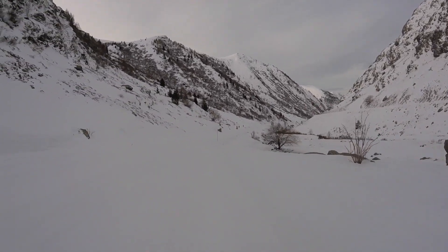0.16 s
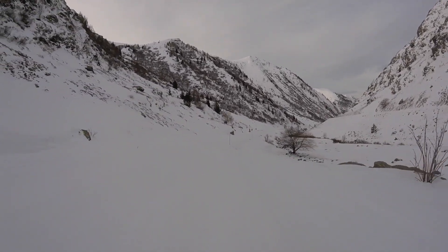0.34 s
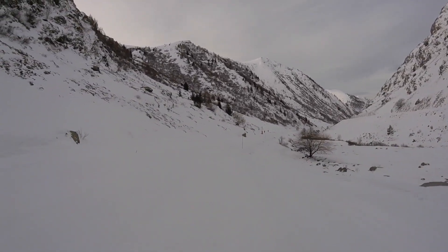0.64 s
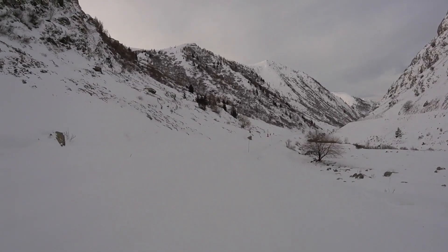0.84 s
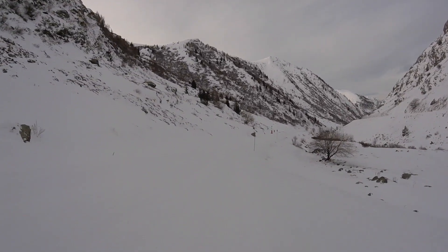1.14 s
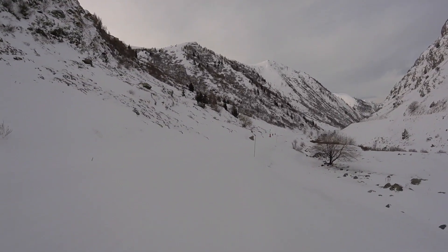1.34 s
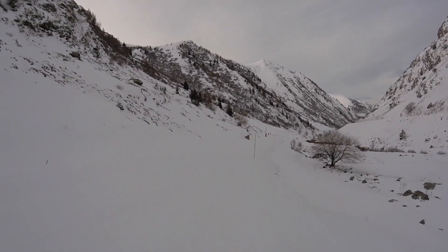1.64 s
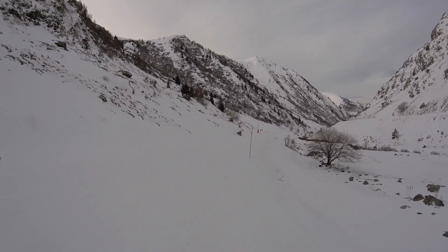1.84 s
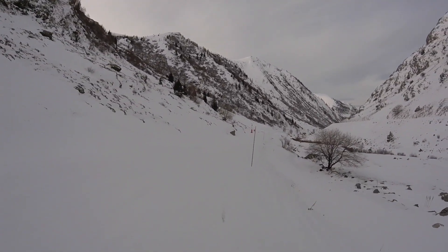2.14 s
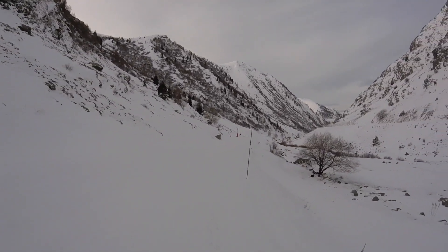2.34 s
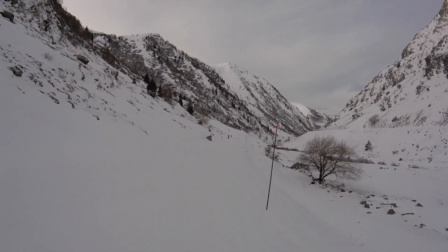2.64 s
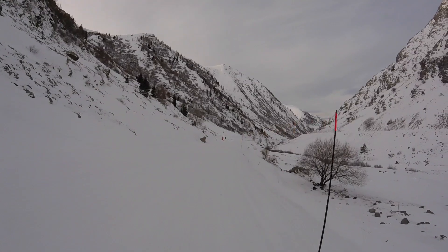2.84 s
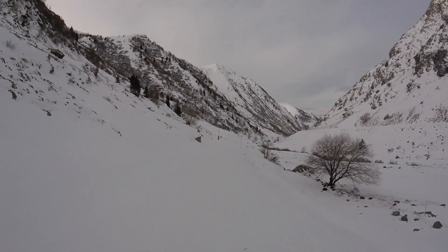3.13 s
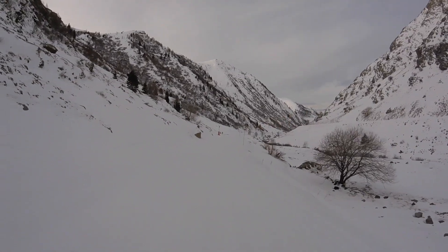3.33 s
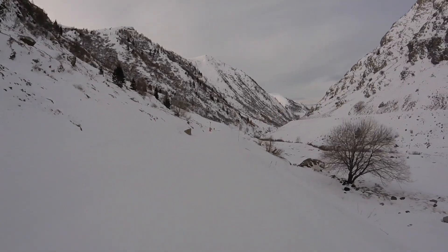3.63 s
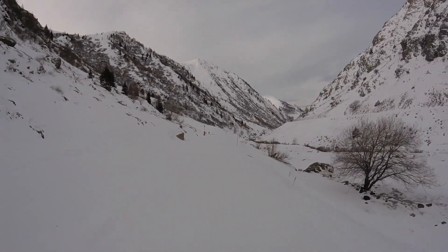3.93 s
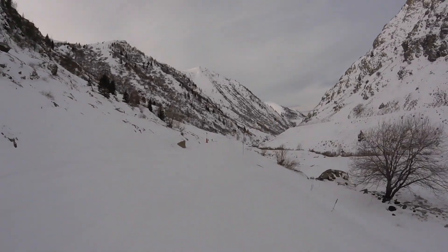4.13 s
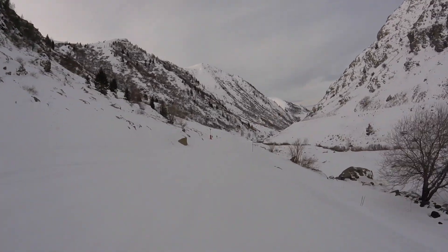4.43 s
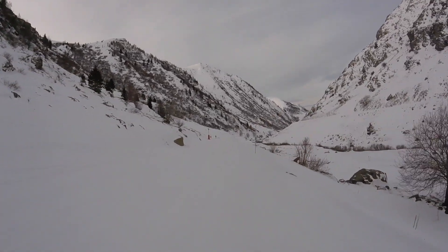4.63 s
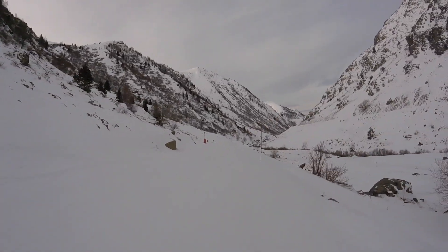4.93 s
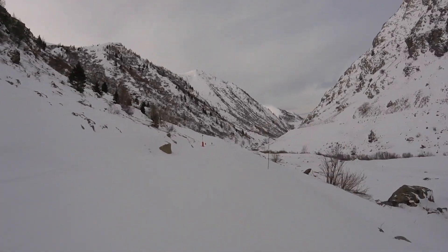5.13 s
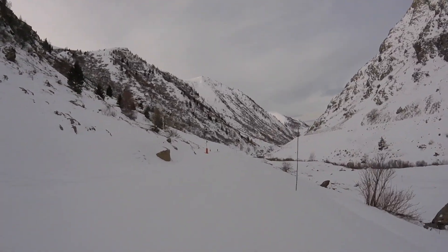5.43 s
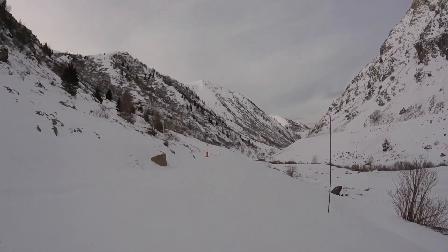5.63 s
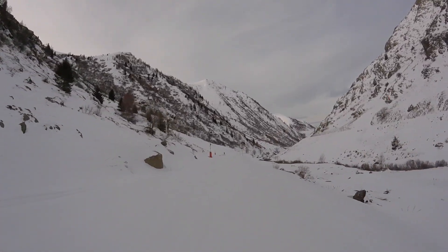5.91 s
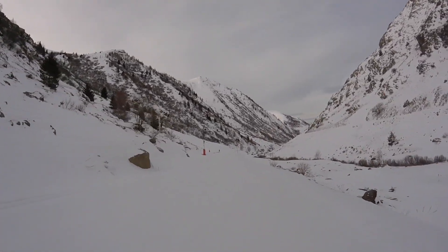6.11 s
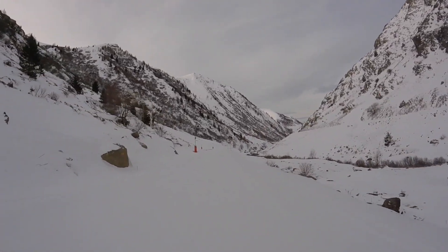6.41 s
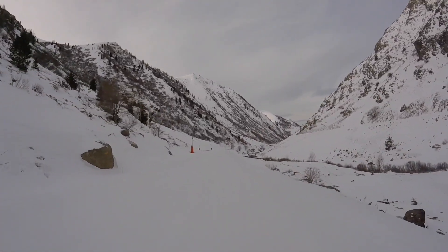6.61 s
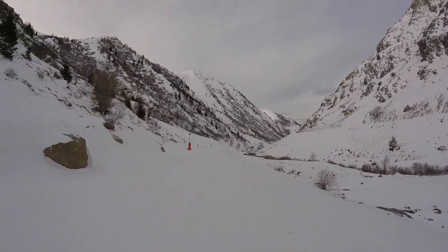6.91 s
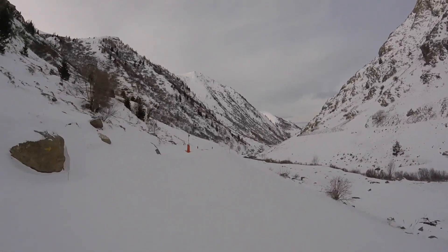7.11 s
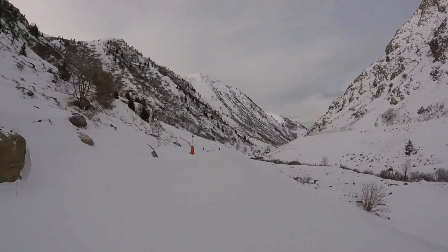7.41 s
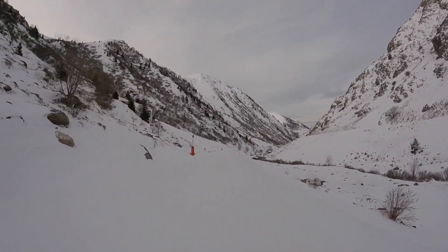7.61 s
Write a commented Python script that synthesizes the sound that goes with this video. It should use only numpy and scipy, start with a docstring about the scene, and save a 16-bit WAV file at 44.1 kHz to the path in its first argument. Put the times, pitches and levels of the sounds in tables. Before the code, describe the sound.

Skis glide over snow with a patchy crunch and small cracks, under gusting low wind rumble on the microphone.

```python
"""On a snow slope, gliding on skis; the microphone is a small camera's, carried by the skier in a
closed plastic case. Underfoot, snow grains crush in a dense, patchy crackle and crusts crack now and
then, all coloured by the resonances of the case. Right on the case, wind buffets with a deep rumble
over a steady rush. Two faint thin tones sit in the treble."""
import sys
import numpy as np
from scipy import signal
from scipy.fft import rfft, irfft
from scipy.io import wavfile
from scipy.ndimage import uniform_filter1d

SR = 44100
rng = np.random.default_rng(int(sys.argv[2]) if len(sys.argv) > 2 else 0)


def to_wav(sig):
    """Store sig (one row per channel, or 1-D mono) as 16-bit WAV at the path in sys.argv[1].

    Samples outside -1..1 are clipped; the rate is SR.
    """
    pcm = np.clip(np.atleast_2d(sig), -1, 1) * 32767
    pcm = np.round(pcm).astype(np.int16)
    wavfile.write(sys.argv[1], SR, pcm.T)  # frames by channels


N = 342216
T = np.arange(N) / SR

# Crusts cracking, with their peaks before coupling to the case: start_s, low_modes_db, then relative
# to that: deep_db, upper_low_db, middle_db, upper_middle_db, top_db, sheen_db
CRUST_CRACKS = [(0.124, -58, -11, -6, -20, -17, -22, -10), (0.138, -51, -10, -9, -21, -19, -18, -14),
                (0.1534, -57.0, -12, 10, -1, -5, -4, -3), (0.1616, -51, -10, -2, 0, -7, -22, -16),
                (0.2177, -50, -2, -4, -11, -16, -16, -16), (0.2353, -48, -22, -6, -8, -12, -14, -15),
                (0.2933, -55, -12, -10, -6, -17, -22, -9), (0.3141, -56, -16, 5, -15, -13, -10, -6),
                (0.4218, -52, -9, 1, -16, -18, -11, -17), (0.4644, -50, -11, -4, -16, -13, -19, -20),
                (0.5175, -52, -3, 1, -4, -16, -13, -16), (0.6895, -56, -15, -3, -14, -16, -11, -14),
                (1.0185, -53, -12, -3, -3, -5, -11, -12), (1.064, -53, -7, -10, -10, -7, -16, -11),
                (1.225, -56, -7, -3, -3, -6, -13, -9), (1.3134, -48, -10, -2, -22, -22, -21, -14),
                (1.6828, -49.5, -18, -4, -1, -14, -19, -18), (1.698, -60, -6, 4, 7, 1, -12, -6),
                (1.7032, -61, -6, 5, 11, 1, -12, -5), (1.797, -59.5, -6, -3, 5, 2, -10, -6),
                (1.843, -54, 0, 0, -10, -9, -18, -10), (1.924, -46, -9, -14, -15, -19, -9, -8),
                (1.9537, -51, 1, -10, 2, 2, -13, -3), (1.966, -50, -1, -5, -6, -18, -16, -11),
                (1.9736, -48, -8, 0, -8, -17, -19, -10), (1.983, -57, -7, 0, 3, -9, -14, -10),
                (2.074, -46, -3, -3, 2, -5, -15, -3), (2.0932, -53, -2, 5, 6, 5, -8, -11),
                (2.1006, -52, -7, -9, -1, -1, -12, -12), (2.112, -55.0, -7, -5, -3, -4, -13, -9),
                (2.193, -54, -17, -13, -21, -13, -21, -13), (2.2622, -51, -6, -3, -2, -11, -13, -10),
                (2.29, -55, -6, 7, 5, -7, -6, 6), (2.422, -50, 0, 1, -11, -4, -17, -16),
                (2.4847, -62, -7, -3, 11, 12, 14, 12), (2.497, -58, -6, 6, 14, 8, 6, 7),
                (2.5638, -54, 7, 0, -6, -11, -12, -16), (2.6892, -50.5, -2, -4, -5, -5, -24, -16),
                (2.704, -48, -13, -8, -8, -12, -22, -17), (2.7113, -52, -7, -2, -5, -10, -23, -13),
                (3.0246, -48, -8, 0, -11, -17, -23, -25), (3.3298, -45, 3, -16, -11, -9, -17, -14),
                (3.342, -47.5, 7, -20, -9, -7, -20, -16), (3.4236, -45.5, -21, -2, -16, -21, -31, -17),
                (3.446, -53, 12, -14, -11, -21, -15, -15), (3.4653, -47, -7, -3, -4, -7, -20, -19),
                (3.504, -48.5, 2, 1, -5, -7, -18, -11), (3.632, -53, -8, -1, -6, -4, -12, -12),
                (3.661, -50.0, -9, -2, -12, -18, -25, -16), (3.694, -44, -12, -3, -4, -16, -22, -10),
                (3.7632, -44, -5, -15, -12, -15, -18, -13), (3.7732, -43.5, -11, -8, -10, -15, -18, -16),
                (3.7908, -57.0, -2, -2, 0, -1, -9, -9), (3.7997, -40.5, 6.5, -15, -14, -15, -26, -23),
                (3.8167, -59, -8, -8, -10, -12, -10, 4), (3.849, -59, -8, -2, 3, -4, -12, -8),
                (3.8665, -50, -10, 1, -19, -14, -20, -12), (4.0266, -60, 1, 2, 6, -6, -9, -9),
                (4.103, -53, -6, -3, -10, -15, -15, -13), (4.3535, -57.5, -5, 4, 3, -3, -6, 2),
                (4.4284, -56, -6, 4, 6, -3, -7, -2), (4.5016, -53.5, -5, -8, -10, -12, -18, -20),
                (4.5522, -46.5, -10, 2.5, -16, -20, -22, -16), (4.7184, -50, -13, -19, -16, -15, -19, -17),
                (4.737, -56, -9, 6.5, -10, -18, -15, -13), (4.7786, -41, -13, -3.5, -7, -11, -19, -8),
                (4.7864, -65, 0, 6, 11, 10, -8, -7), (4.8078, -51, 7, 4, -4, -17, -19, -15),
                (4.819, -51, 5, -6, 0, -6, -11, -5), (5.0942, -50.5, 1, -5, -14, -5, -12, -18),
                (5.166, -55, -5, -3, -7, -11, -4, -6), (5.2313, -56.5, -11, 4, 0, -8, -9, -7),
                (5.3074, -53, -7, -3, -10, -3, -15, -8), (5.3547, -56, -12, -16, -23, -16, -15, -16),
                (5.444, -54, -8, -2, -14, -14, -18, -18), (5.482, -45, -23, -1.5, -5, -21, -7, -10),
                (5.6044, -57, -9, -6, -11, -10, -22, -19), (5.6845, -47, 4, -19, -16, -11, -16, -17),
                (5.9585, -54.5, -18, -3, -3, -12, -12, -18), (6.064, -56.5, 7, -16, -14, -14, -15, -16),
                (6.44, -53, -10, -18, -8, -7, -16, -11), (6.461, -53, -8, -15, -9, -13, -17, -14),
                (6.6803, -46.5, -7, -14, -9, -17, -19, -19), (6.7396, -49, -9, -5, -11, -25, -27, -20),
                (6.7472, -52, 0, -11, -8, -9, -19, -15), (6.768, -48.5, -8, -16, -9, -15, -23, -19),
                (6.8368, -52, -13, -13, -17, -23, -16, -17), (6.88, -52, -8, -5, -15, -18, -22, -13),
                (7.0255, -52, -11, -3, -17, -13, -18, -19), (7.1978, -45, -4, -1, -11, -8, -9, -17),
                (7.2144, -56, -20, -10, -7, -15, -16, -20), (7.223, -43, 2, -8, -20, -20, -29, -25)]


def undb(db):
    return 10 ** (np.asarray(db) / 20)


def unit(x):
    return x / np.sqrt(np.mean(x ** 2))


def curves(table):
    """Columns of a table, joined by straight lines in time."""
    times, *columns = np.transpose(table)
    return [np.interp(T, times, column) for column in columns]


def bells(centre_s, half_s, height):
    """Sum of bell-shaped swells."""
    coarse = T[::64]
    shapes = np.exp(-((coarse - np.c_[centre_s]) / np.c_[half_s]) ** 2)
    return np.interp(T, coarse, height @ shapes)


def wander(rate_hz):
    """Random levels, held and smoothed twice; rms 1."""
    hold = int(SR / rate_hz)
    steps = np.repeat(rng.standard_normal(N // hold + 1), hold)
    return unit(uniform_filter1d(uniform_filter1d(steps, hold), hold)[:N])


def coloured(spectrum):
    """Noise of rms 1 with the given spectral shape."""
    hz, db = np.transpose(spectrum)
    grid = np.fft.rfftfreq(N, 1 / SR) + 1e-3
    gain = undb(np.interp(np.log(grid), np.log(hz), db))
    return unit(irfft(rfft(rng.standard_normal(N)) * gain, N))


def case_ring(modes, size=2048):
    """Impulse response of the plastic case: steep resonances whose powers add; energy 1."""
    f = np.fft.rfftfreq(size, 1 / SR) + 1
    power = sum(undb(2 * db) / (1 + ((f - hz * hz / f) / width) ** 2) ** 2 for hz, width, db in modes)
    cepstrum = irfft(np.log(power) / 2)
    cepstrum[1:size // 2] *= 2  # minimum phase: the ring follows the push
    cepstrum[size // 2 + 1:] = 0
    response = irfft(np.exp(rfft(cepstrum)))[:size // 2]
    return response / np.sqrt(np.sum(response ** 2))


def snow_grains(per_s, spread_db):
    """Grains break at random moments with uneven strength."""
    breaks = rng.random(N) < per_s / SR
    clicks = breaks * rng.standard_normal(N)
    return unit(clicks * undb(spread_db * np.minimum(rng.exponential(size=N), 4)))


def snow_lumps(per_s, rise_s, fall_s):
    """The level rises as a ski meets a lump, then falls away; mean 0, spread 1."""
    level = (rng.random(N) < per_s / SR) * rng.random(N)
    for lag_s in (rise_s, fall_s):
        level = signal.lfilter([1], [1, -np.exp(-1 / (lag_s * SR))], level)
    level = np.tanh(unit(level) / 2)  # piled-up lumps saturate
    return unit(level - np.mean(level))


def skis():
    """Crushed snow and cracking crusts ring the case in eight groups of modes."""
    # Crush in each group: time_s, low_db, upper_low_db, middle_db, upper_middle_db, top_db, sheen_db
    glide = [(0.0, -61.5, -65, -68, -70.5, -74, -75), (0.28, -62.5, -66.5, -71.5, -75, -76, -77.5),
             (0.45, -64.5, -66.5, -72.5, -78, -75, -79), (0.65, -69.5, -77, -74, -78, -80.5, -81.5),
             (0.95, -66.5, -68, -72, -72.5, -77.5, -78), (1.2, -65.5, -70, -70, -71, -77, -77.5),
             (1.42, -68.5, -71.5, -71, -75, -81, -81), (1.71, -68.5, -70.5, -74, -77, -82, -82),
             (1.9, -67.5, -75, -72, -72, -80, -77.5), (2.07, -67.5, -69, -72, -73, -81, -77.5),
             (2.35, -65, -75, -69, -71, -78, -76.5), (2.55, -63, -68, -67.5, -69.5, -80, -76.5),
             (2.72, -63.5, -64, -65, -67.5, -80, -76), (2.9, -63, -67.5, -64, -66.5, -78, -74.5),
             (3.12, -62, -66, -66, -66.5, -78, -78), (3.39, -59, -66, -62, -64.5, -77, -74),
             (3.65, -62.5, -65, -66.5, -66.5, -77.5, -75.5), (3.87, -65, -71, -67.5, -71.5, -79, -77.5),
             (4.2, -67.5, -70.5, -72, -74, -83, -79.5), (4.5, -66, -66.5, -68, -72, -78, -79),
             (4.75, -65, -67.5, -70.5, -71.5, -77, -77.5), (5.06, -63.5, -63.5, -68.5, -68.5, -75.5, -77.5),
             (5.35, -67.5, -66, -70, -71.5, -77, -77.5), (5.65, -65.5, -72, -73, -76, -79, -80.5),
             (5.9, -68.5, -72, -72, -76.5, -82, -81), (6.3, -64, -70, -72.5, -73.5, -78, -81),
             (6.55, -67.5, -72, -72.5, -76.5, -82, -81), (6.9, -67, -72.5, -75, -75.5, -81.5, -81),
             (7.15, -66, -72, -73, -77.5, -82, -81.5), (7.4, -66, -71.5, -73, -72.5, -80, -81),
             (7.76, -68, -69, -71, -77, -81, -82)]
    # Crush in the deep modes against the low, and in the high against the sheen: time_s, offset_db
    deep_offset, high_offset = [(0, -6), (.6, -2), (1.5, -6), (2.0, -2), (2.45, -3), (2.8, -6),
                                (3.35, -4.5), (3.8, -4.5), (4.1, -2.5), (4.6, -6), (5.4, -3.5), (5.7, -5.5),
                                (6.1, -3.5), (6.8, -5), (7.3, -4.5), (7.76, -5)], [(0, -1), (1.2, 0), (2.0, -1), (2.4, -1), (2.85, -5),
                                               (3.2, -1.5), (3.7, -3.5), (4.5, 0), (6, -1), (7.76, -1)]
    # Rough patches scraping past; each group takes a share: centre_s, swell_db, half_length_s
    scrapes = [(0.083, 2, 0.033), (0.162, 3, 0.019), (0.308, 3.5, 0.012), (0.453, 3, 0.02),
               (1.083, 4, 0.024), (1.274, 4, 0.037), (1.688, 6, 0.012), (1.966, 12, 0.039),
               (2.097, 10, 0.044), (2.27, 3.5, 0.029), (2.414, 4.5, 0.048), (2.546, 1, 0.018),
               (2.747, 4, 0.059), (3.332, 0, 0.011), (3.436, 0, 0.11), (3.76, 10, 0.056), (3.861, 7, 0.01),
               (4.102, 3, 0.014), (4.494, 4.5, 0.06), (4.744, -0.5, 0.021), (4.78, 8, 0.028),
               (4.82, 2, 0.022), (5.085, 4, 0.012), (6.7, 7, 0.034), (6.884, 7, 0.1), (7.225, 6.5, 0.061)]
    # Resonances of the case: pitch_hz, width_hz, relative_db
    deep, low, upper_low = [(918, 560, -5), (1227, 390, 3)], [(1385, 295, 1), (1540, 224, 0.5)], [(1656, 122, 0.99), (1784, 144, -1.9)]
    middle, upper_middle = [(2461, 220, 0.95), (2751, 354, 3.2)], [(3043, 216, 0), (3197, 130, -7.5)]
    top, sheen, high = [(4180, 770, -8.5), (4547, 470, -3)], [(5306, 540, 1), (5740, 300, 0)], [(6230, 1140, 1), (7180, 830, -7),
                                                                (8170, 1270, -9)]
    # modes, crack_column, own_share, lump_db, coupling_db, scrape_share
    groups = [(deep, 1, .4, 1.6, -3.5, .8), (low, 0, .35, 1.5, 2.5, .75),
              (upper_low, 2, .3, 1.6, -.3, .85), (middle, 3, .33, 1.6, .3, .7),
              (upper_middle, 4, .33, 1.6, .3, .7), (top, 5, .8, .9, -2.5, .4),
              (sheen, 6, .8, .9, -3.1, .4), (high, 6, .8, .9, -6, .4)]
    centre_s, swell_db, half_s = np.transpose(scrapes)
    scrape_db = bells(centre_s, half_s, swell_db)
    shared_grains = snow_grains(per_s=1800, spread_db=1.5)
    patches = snow_lumps(per_s=76, rise_s=0.0029, fall_s=0.0029)
    force = crust_force(crumble_db=-24, rise_s=0.0006, decay_s=0.0024)
    glide_db = curves(glide)
    levels_db = [glide_db[0] + curves(deep_offset)[0], *glide_db, glide_db[-1] + curves(high_offset)[0]]
    out = 0
    for crush_db, group in zip(levels_db, groups):
        modes, crack_column, own_share, lump_db, coupling_db, scrape_share = group
        # each size of grain also breaks on its own, so the groups agree only in part
        own_grains = snow_grains(per_s=3000, spread_db=-1.0)
        crush = np.sqrt(1 - own_share) * shared_grains + np.sqrt(own_share) * own_grains
        jumps_db = lump_db * patches + 0.94 * snow_lumps(per_s=110, rise_s=0.00087, fall_s=0.01)
        crush = unit(crush * undb(jumps_db)) * undb(crush_db + scrape_share * scrape_db)
        crackle = signal.fftconvolve(crush, case_ring(modes))[:N]
        out = out + crackle + undb(coupling_db) * crust_cracks(force, modes, crack_column)
    return out


def even(noise, share):
    """Takes a share of the chance swells out of a narrow noise."""
    swell = uniform_filter1d(np.abs(signal.hilbert(noise)), int(0.053 * SR))
    return unit(noise / (swell + 0.28) ** share)


def eddies(centre_s, level_db, half_s, bed_db):
    """Gain of a quiet bed of wind with a smooth swell for each eddy; powers add."""
    return np.sqrt(undb(2 * bed_db) + bells(centre_s, half_s, undb(2 * level_db)))


def wind():
    """Large eddies shove the case, small ones flutter; the rush holds but its low end is buffeted."""
    # Spectra of the air on the case: frequency_hz, relative_db
    rumble_shape, flutter_shape, rush_shape = [(2, 1), (6, 3.5), (15, 13.5), (22, 10.5), (32, -8.5),
                                               (60, -69), (300, -120)], [(8, -79), (16, -0.5), (27, 8.5), (40, 8),
                                                               (66, -10), (110, -30.5), (170, -42),
                                                               (500, -120)], [(40, -14), (70, 0.5),
                                                                                (130, -5), (290, -12),
                                                                                (760, -19), (1500, -27.5),
                                                                                (2200, -27.5),
                                                                                (3600, -30.5),
                                                                                (5700, -41.5), (8500, -39),
                                                                                (10000, -42.5),
                                                                                (11200, -44), (12600, -48),
                                                                                (13600, -57), (14700, -78)]
    # Large eddies: centre_s, level_db, half_length_s
    shoves = [(0.01, -41.5, 0.065), (0.186, -38.5, 0.04), (0.338, -37.5, 0.046), (0.503, -46, 0.037),
              (0.648, -44, 0.088), (0.847, -45, 0.075), (1.054, -39.5, 0.039), (1.685, -43, 0.17),
              (2.134, -32.5, 0.1), (2.643, -34.5, 0.15), (3.092, -32, 0.024), (3.357, -37.5, 0.053),
              (3.62, -43.5, 0.13), (4.056, -32.5, 0.11), (4.265, -30, 0.031), (4.453, -37.5, 0.12),
              (4.84, -38.5, 0.097), (5.232, -39, 0.081), (5.466, -35.5, 0.022), (5.643, -30.5, 0.048),
              (5.865, -34.5, 0.039), (6.34, -39, 0.059), (6.482, -40, 0.029), (6.815, -44, 0.049),
              (7.122, -32.5, 0.068), (7.427, -39, 0.061)]
    # Small eddies: centre_s, level_db
    thumps = [(.04, -51), (.34, -38), (.47, -44.5), (.58, -42), (.71, -38), (1.09, -44.5), (1.34, -66),
              (1.449, -41.5), (1.81, -44), (2.07, -52), (2.2, -39), (2.6, -40), (2.87, -58), (2.981, -37),
              (3.12, -49), (3.26, -46), (3.372, -33.5), (3.52, -54), (3.76, -38), (4.02, -38), (4.14, -35),
              (4.4, -47), (4.54, -42.5), (4.8, -45), (4.93, -42.5), (5.19, -41.5), (5.32, -40), (5.43, -44),
              (5.75, -43), (6.08, -40.5), (6.19, -47), (6.37, -43), (6.49, -40), (6.699, -41), (6.87, -45),
              (7.23, -45), (7.39, -48), (7.641, -40)]
    # The low end of the rush swelling and easing: time_s, swell_db
    low_swell = [(0, -0.5), (.5, -2), (1.0, 2.5), (1.6, -2), (2.1, -1), (2.6, 0), (3.2, -1.5), (3.8, 0),
                 (4.4, -2), (5.0, -0.5), (5.6, 0), (6.1, -1), (6.6, -1), (7.1, -1), (7.76, -1.5)]
    rumble = even(coloured(rumble_shape), share=0.24) * eddies(*np.transpose(shoves), bed_db=-50)
    thump_gain = eddies(*np.transpose(thumps), half_s=[0.017], bed_db=-52)
    flutter = even(coloured(flutter_shape), share=0.83) * thump_gain
    rush = coloured(rush_shape) * undb(-59.5 + 0.34 * wander(rate_hz=7.2))
    low_rush = signal.lfilter(*signal.butter(1, 197, fs=SR), rush)
    # the low end follows the thumps a little and has jolts of its own
    buffets = unit(thump_gain ** 0.15 * undb(0.56 * wander(rate_hz=14)))
    low_gain = undb(curves(low_swell)[0]) * buffets
    return rumble + flutter + rush + low_rush * (low_gain - 1)


def camera_whine():
    """Two faint tones of steady pitch and wavering level, probably from the camera's circuits."""
    # Treble tones: pitch_hz, median_rms_db
    tones = [(9650, -99), (9591, -105)]
    return sum(np.sqrt(2) * undb(db + 3.6 * wander(rate_hz=14)) * np.sin(2 * np.pi * hz * T)
               for hz, db in tones)


def crust_force(crumble_db, rise_s, decay_s):
    """Each crust gives way with a snap, then a crumble that builds at once and soon dies."""
    t = np.arange(1024) / SR
    crumble = undb(crumble_db) * (1 - np.exp(-t / rise_s)) * np.exp(-t / decay_s)
    force = crumble * rng.standard_normal((len(CRUST_CRACKS), len(t)))
    force[:, 0] = 1  # the snap
    return force


def crust_cracks(force, modes, column):
    """Each crust rings one group of modes up to its own peak; lower modes answer to a softer push."""
    snap_cycles = 0.085  # the crust gives way within this part of a cycle of the first mode
    pole = np.exp(-modes[0][0] / (snap_cycles * SR))
    response = signal.lfilter([1], [1, -2 * pole, pole ** 2], case_ring(modes))
    rings = signal.fftconvolve(force, response[None], axes=1)
    out = np.zeros(N + rings.shape[1])
    for (start_s, low_db, *offsets_db), ring in zip(CRUST_CRACKS, rings):
        peak = undb(low_db + [0, *offsets_db][column])
        out[int(start_s * SR):][:len(ring)] += ring * peak / np.max(np.abs(ring))
    return out[:N]


def scene():
    """Skis, wind and whine at one microphone."""
    return (skis() + wind() + camera_whine())[None]


def record(dry):
    """The camera, already running, cuts the treble above 14.8 kHz."""
    lowpass = signal.ellip(8, .2, 70, 14800, fs=SR, output="sos")
    first_sample = dry[:, :1]
    return signal.sosfilt(lowpass, dry - first_sample) + first_sample


dry = scene()
out = record(dry)
to_wav(out)
```